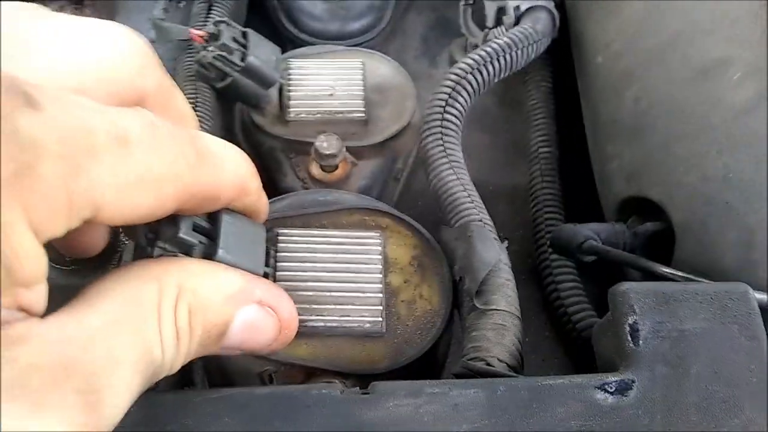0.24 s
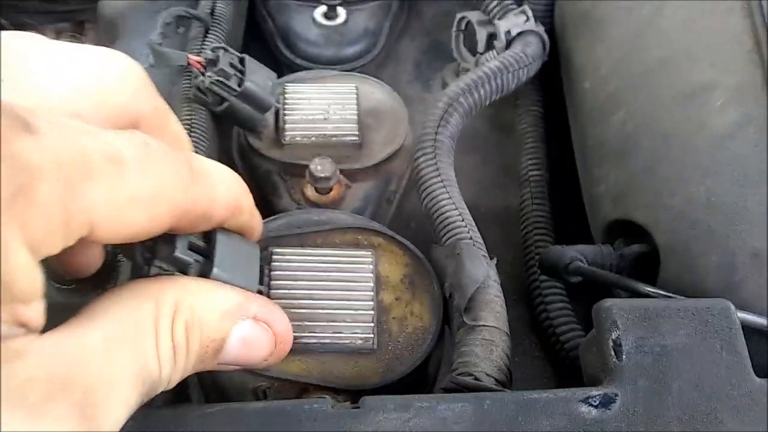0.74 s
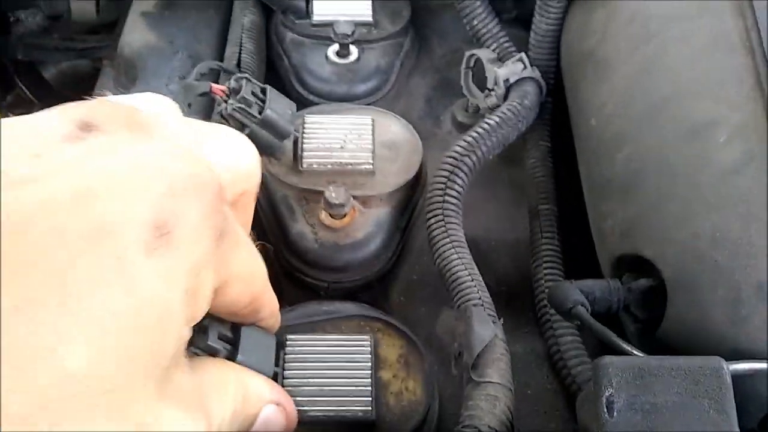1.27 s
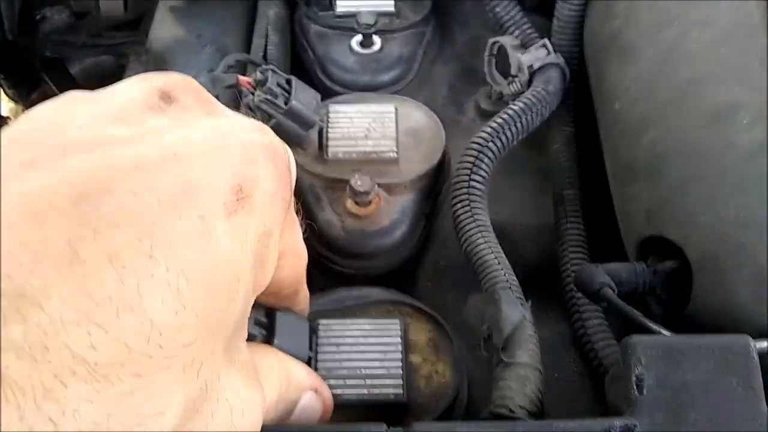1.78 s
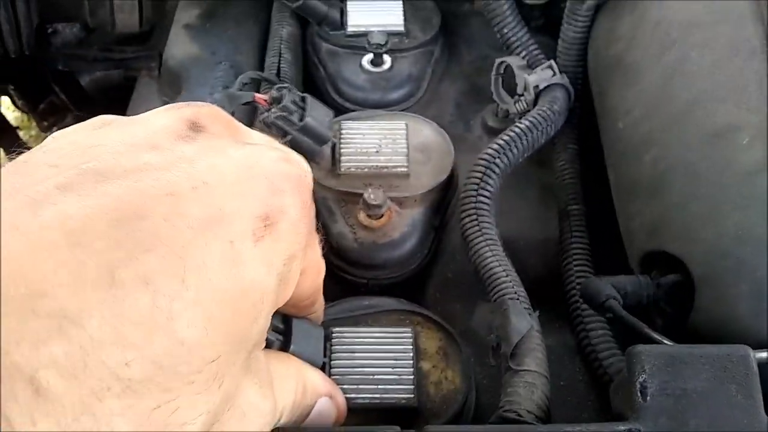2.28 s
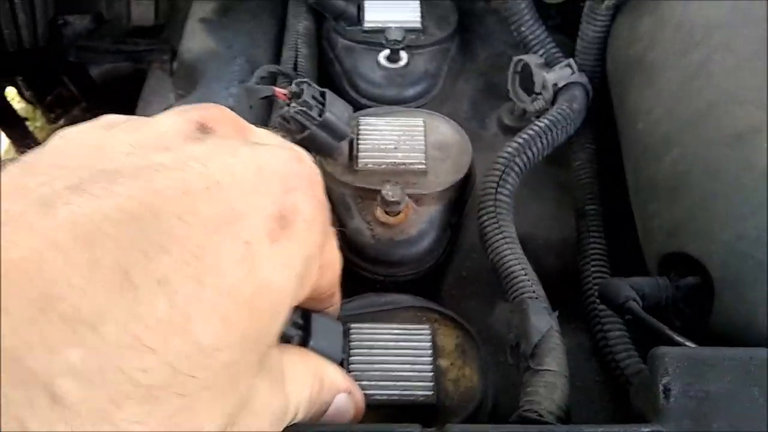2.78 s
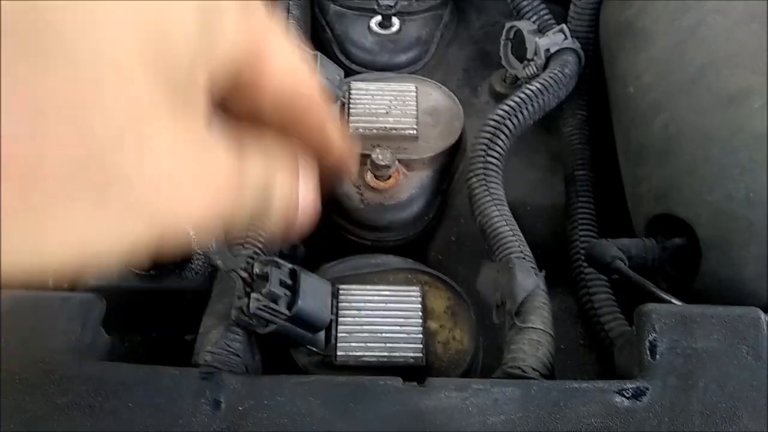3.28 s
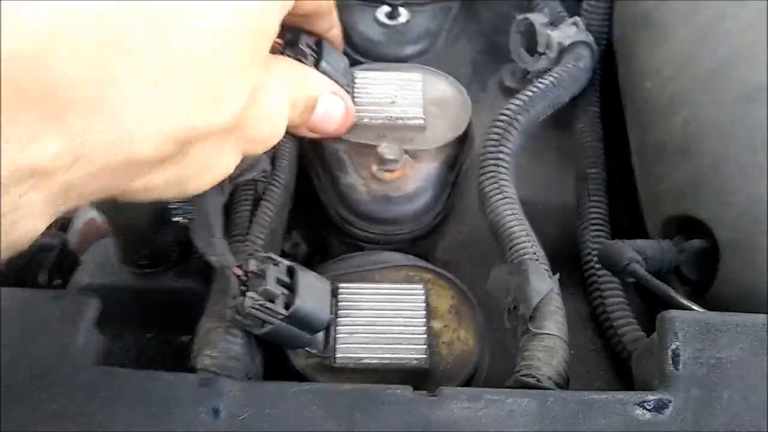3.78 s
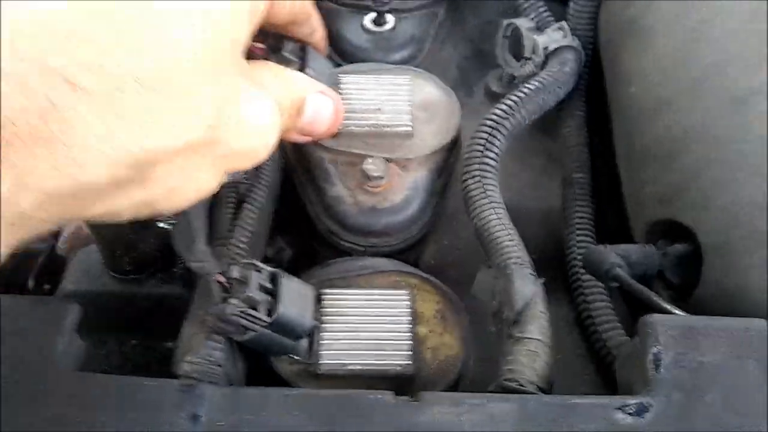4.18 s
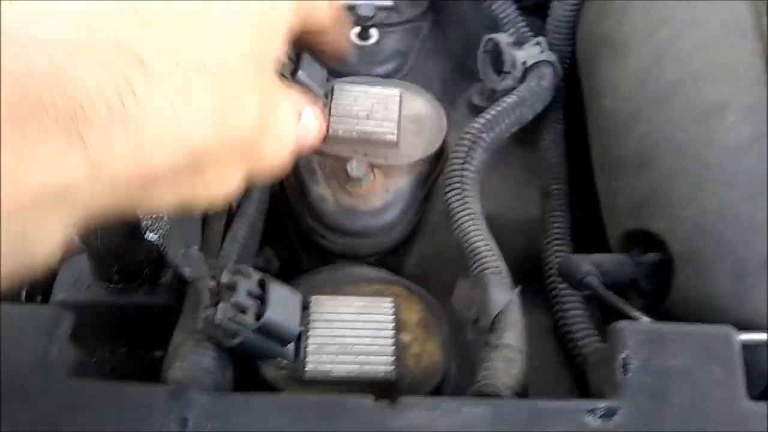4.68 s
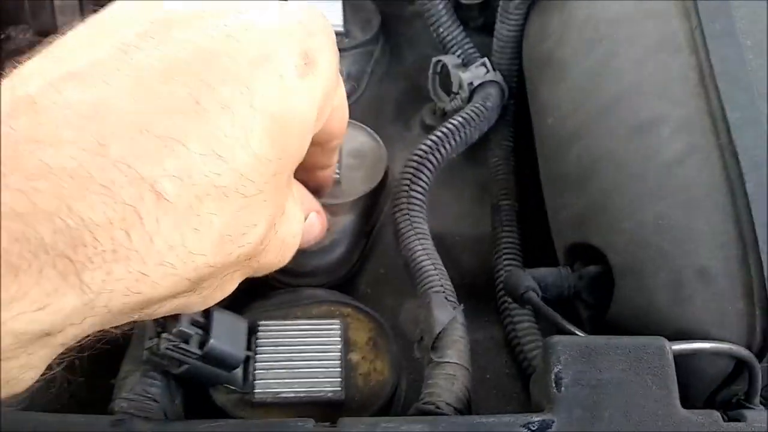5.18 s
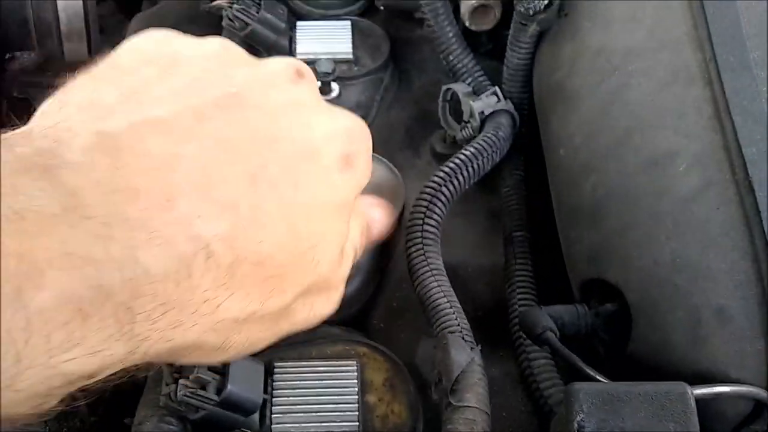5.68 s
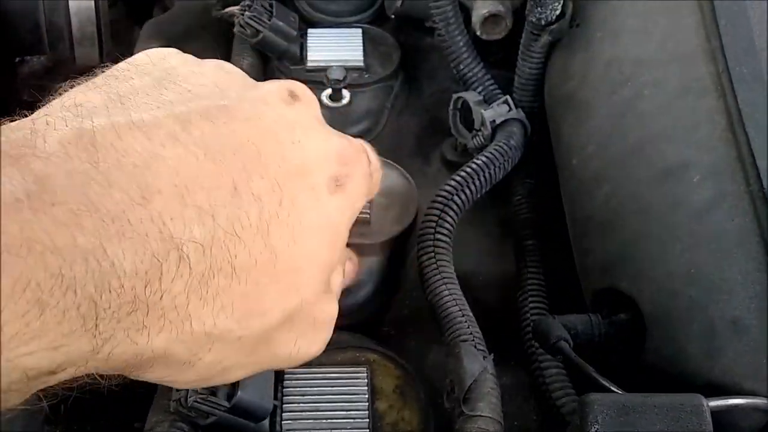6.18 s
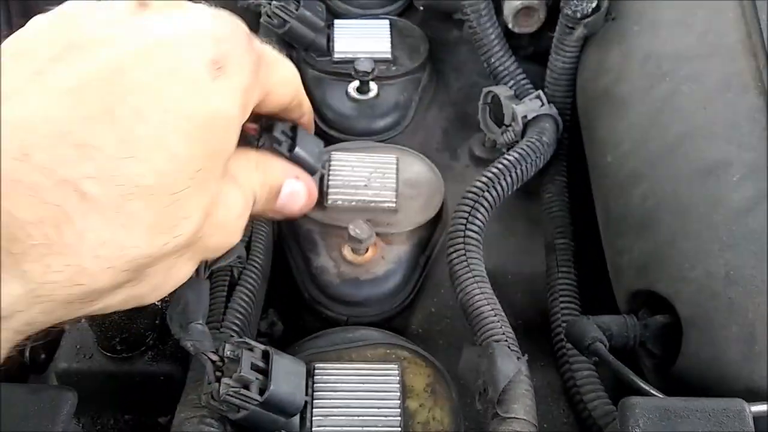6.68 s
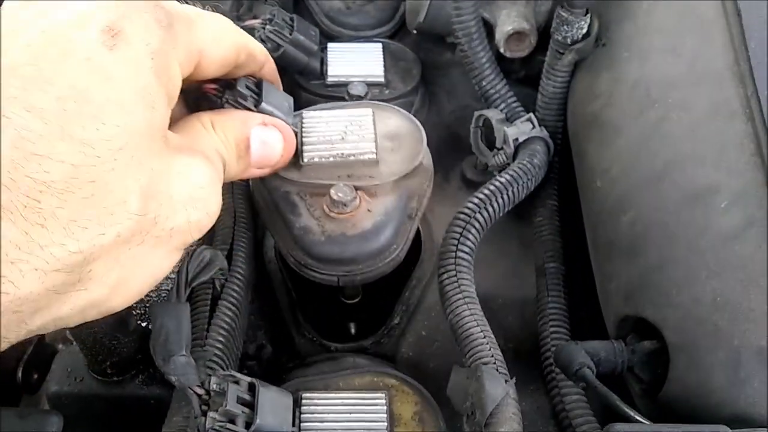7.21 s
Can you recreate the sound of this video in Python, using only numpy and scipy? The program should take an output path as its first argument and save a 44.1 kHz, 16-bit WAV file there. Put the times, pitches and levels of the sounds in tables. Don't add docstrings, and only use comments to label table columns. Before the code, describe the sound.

Close under an open bonnet, a six-cylinder engine idles with metallic clatter, low exhaust throb and airy hiss. Sharp ignition snaps tick regularly through the first second, then cease. The belt chirps on every firing, growing into harsher squeals as the idle slows and stumbles. Two isolated duller pops come midway, and stronger hollow pops return at the end. A phone microphone very near gives a thin, dry stereo sound.

```python
import sys
import numpy as np
from scipy import signal
from scipy.fft import rfft, irfft, next_fast_len
from scipy.io import wavfile
from scipy.ndimage import uniform_filter1d

SR = 44100
rng = np.random.default_rng(int(sys.argv[2]) if len(sys.argv) > 2 else 0)


def decibels_to_gain(level_db):
    exponent = np.asarray(level_db, float) / 20
    return 10 ** exponent


def bounce(signal):
    frames = np.transpose(np.atleast_2d(signal))
    limited = np.clip(frames, -1, 1)
    pcm = np.round(limited * 32767).astype(np.int16)
    wavfile.write(sys.argv[1], SR, pcm)


N = 328545

# time in seconds, loudness of clatter and hiss in dB, belt slip
# in dB, idler pulley slip in dB.
ENGINE_BAY = [(0, 3.5, -33, -8), (.12, -4, 2, -10), (.5, 0, -15, -4), (.95, -2, 2, -3), (1.2, 0.5, 1.5, -4),
              (1.68, -1, 5, -4), (2.0, -1, 5, 1), (2.7, 2, -2, 1), (3.15, -1.5, 4.5, 0),
              (3.4, -1, -0.5, -1), (3.9, 2.5, 1.5, -2), (4.25, -1.5, 4.5, -1.5), (5.0, -1, 5.5, 3),
              (5.4, 1, 3.5, -1.5), (6.2, -2, 7, 6.5), (6.8, 3.5, -1, 0.5), (6.95, -2, -3.5, -3),
              (7.45, -3, 4.5, -2)]
# time in seconds, firings per second, misfire depth from 0 to 1.
IDLE_SPEED = [
    (0, 33.4, .3),
    (.9, 33.3, .3),
    (1.6, 32.6, .35),
    (2.4, 32.85, .35),
    (3.2, 32.4, .4),
    (3.6, 31.2, .6),
    (4.3, 30.9, .9),
    (5, 30.4, 1),
    (5.7, 30.25, 1),
    (7.45, 30.13, 1),
]


def unit(x):
    return x / np.sqrt(np.mean(x ** 2) + 1e-20)


def along(points, hz):
    f, v = np.transpose(points)
    return np.interp(np.log(hz + 1), np.log(f + 1), v)


def curves(rows):
    s, *columns = np.transpose(rows)
    t = np.arange(N) / SR
    return [np.interp(t, s, column) for column in columns]


def filtered(x, response):
    length = x.shape[-1]
    m = next_fast_len(length + 8192)
    hz = np.fft.rfftfreq(m, 1 / SR)
    return irfft(rfft(x, m) * response(hz), m)[..., :length]


def modes(rows):
    def response(f):
        total = 0
        for k, (centre, width, db) in enumerate(rows):
            damping = 1j * f * width
            sign = (-1) ** k
            total = total + sign * decibels_to_gain(db) * damping / (centre * centre - f * f + damping)
        return total
    return response


def ports(colour, patchy_db=0):
    # frequency in Hz, likeness from 0 to 1.
    alike = [(100, 1), (500, 0.88), (900, 0.26), (1500, 0.069), (3000, 0.15)]
    pair = rng.standard_normal((2, N))
    if patchy_db:
        z = signal.stft(pair, nperseg=256)[2]
        field = rng.standard_normal(z.shape[1:])
        field = uniform_filter1d(field, size=5, axis=0)
        field = uniform_filter1d(field, size=9, axis=1)
        pair = signal.istft(z * decibels_to_gain(patchy_db * unit(field)), nperseg=256)[1][:, :N]

    def share(hz):
        angle = np.arccos(np.clip(along(alike, hz), 0, 1)) / 2
        return colour(hz) * np.array([np.cos(angle), np.sin(angle)])

    common, apart = filtered(pair, share)
    return unit(np.array([common + apart, common - apart]))


def bursts(times, levels_db, rise, fall):
    marks = np.zeros(N)
    marks[np.round(times * SR).astype(int)] = decibels_to_gain(levels_db)
    t = np.arange(-SR // 20, SR // 20 + 1) / SR
    swell = np.exp(-(t / np.where(t < 0, rise, fall)) ** 2)
    return signal.oaconvolve(marks, swell, "same")


def bay():
    loudness_db = curves(ENGINE_BAY)[0]
    return -31.5 + loudness_db, -40.5 + 1.8 * loudness_db


def exhaust():
    # pitch in Hz, width in Hz, level in dB.
    pipe = [(72, 19, -7.5), (93, 16.2, 3.5), (131.3, 11, -1), (188, 51, -22), (244, 37, -18)]
    # pitch in Hz, width in Hz, level in dB.
    box = [(133, 30, 9), (190, 61, -3)]
    # frequency in Hz, level in dB per Hz.
    flow = [(20, -19), (50, -5), (80, -5), (110, -5.5), (160, -7.5), (280, -17), (500, -23), (900, -44)]
    # time in seconds, level in dB.
    load = [
        (0.0, -43),
        (0.85, -44),
        (1.56, -38),
        (3.48, -39.5),
        (3.94, -37),
        (4.23, -40),
        (6.93, -39.5),
        (6.97, -44),
        (7.45, -42),
    ]
    (rate, misfire), (level_db,) = curves(IDLE_SPEED), curves(load)
    count = np.cumsum(rate) / SR
    count -= count[round(5.668 * SR)]
    fired = np.flatnonzero(np.diff(np.floor(count)))
    dead = fired[np.floor(count[fired + 1]) % 6 == 0]
    pulses, puffs = np.zeros((2, N))
    pulses[fired] = decibels_to_gain(0.46 * rng.standard_normal(len(fired)))
    puffs[dead] = decibels_to_gain(0.6 * rng.standard_normal(len(dead)))
    tone = unit(filtered(pulses, lambda f: modes(pipe)(f) / (1 + 1j * f / 300) ** 2))
    puff = misfire * unit(filtered(puffs, lambda f: modes(box)(f) ** 2))
    rumble = ports(lambda f: decibels_to_gain(along(flow, f)))
    beat = tone + decibels_to_gain(-3.5) * puff + decibels_to_gain(-1.5) * rumble
    return decibels_to_gain(level_db + 7) * beat


def block(slips):
    # pitch in Hz, width in Hz, level in dB.
    metal = [(390, 67, 0), (482, 40.6, 1.5), (577, 55.6, -0.5), (740, 111, -3.5), (1050, 230, -3.5),
             (1279, 119, -2), (1634, 690, -10)]
    clatter_db, _ = bay()
    s, _, _, scuff_db = slips
    sharp = bursts(s, scuff_db + 26, rise=0.0074, fall=0.0095)
    slow = bursts(s, scuff_db + 20, rise=0.029, fall=0.064)
    knock = 1 + sharp + slow
    return decibels_to_gain(clatter_db - 5.5) * knock * ports(modes(metal), patchy_db=1.5)


def chirps():
    # high squeal in dB, low squeal in dB, scuff in dB,
    # lateness in firings.
    cylinders = [(-35, -32.5, -33.5, 0.05), (-55, -45, -40.5, 0.04), (-39.5, -51, -36, 0.056),
                 (-35, -32.5, -34.5, .05), (-32.5, -30, -32, 0.0059), (-33, -33, -31, 0.084)]
    # time in seconds, high squeal in dB, low squeal in dB, scuff in dB.
    grabs = [(0.482, -27, -28, -36), (0.662, -19.5, -45, -35.5), (0.842, -22.5, -52, -44),
             (1.052, -22, -32, -32), (1.383, -16, -39, -32.5), (1.753, -21, -39, -30),
             (2.516, -38, -27, -24.5), (2.855, -23, -34, -26), (3.155, -25.5, -27, -25.5),
             (3.24, -23, -42, -23.5), (3.378, -25, -33, -27.5), (3.818, -17.5, -36, -27),
             (3.849, -17.5, -48, -34), (3.946, -17.5, -26, -37), (3.977, -18, -31, -27),
             (4.367, -18.5, -27, -23.5), (4.434, -24, -31, -28), (4.599, -17, -34, -28),
             (4.762, -15.5, -31, -30), (4.826, -14, -31, -27), (5.087, -22.5, -20.5, -29.5),
             (5.187, -15, -39, -27.5), (5.482, -23.5, -17, -33), (5.781, -18.5, -21, -25),
             (6.112, -19.5, -22, -21), (6.374, -36, -26, -22.5), (6.572, -23, -22, -27),
             (6.741, -31, -20, -29), (6.9, -24, -22, -23.5), (7.168, -19.5, -33, -29)]
    # high squeal in dB, scuff in dB, per full misfire depth.
    misfire_db = (12, 0.5)
    # high squeal in dB, low squeal in dB, scuff in dB.
    scatter_db = (3.5, 4, 2)
    (rate, misfire), (_, slip_db, idler_db) = curves(IDLE_SPEED), curves(ENGINE_BAY)
    count = 0.02 + np.cumsum(rate) / SR
    number = np.arange(1, int(count[-1]))
    habit = np.array(cylinders)[number % len(cylinders)]
    luck = rng.standard_normal((len(number), 4))
    s = np.interp(number + habit[:, 3] + 0.063 * luck[:, 3], count, np.arange(N) / SR)
    at = (s * SR).astype(int)
    high_db, scuff_db = slip_db[at] + np.outer(misfire_db, misfire[at] - 0.5)
    moment_db = np.transpose([high_db, idler_db[at], scuff_db])
    level_db = habit[:, :3] + moment_db + luck[:, :3] * scatter_db
    rows = np.column_stack([s, level_db])
    nearest = np.abs(s - np.array(grabs)[:, :1]).argmin(axis=1)
    rows[nearest] = grabs
    return rows.T


def belt(slips):
    # frequency in Hz, level in dB per Hz.
    air_colour = [(900, -11), (1500, -14.5), (2300, -2), (3300, -5), (5000, 0), (6800, -2.5), (8600, -4.5),
                  (9700, -1.5), (11300, -8), (12200, -8), (12900, -15), (14200, -12)]
    # pitch in Hz, width in Hz, level in dB.
    pulley = [(5548, 67, 1), (5453, 158, -6.5), (7260, 300, -14.5)]
    # pitch in Hz, width in Hz, level in dB.
    idler = [(3795, 65, -1), (3705, 110, -5), (4360, 84, -8)]
    # pitch in Hz, width in Hz, level in dB.
    alternator = [(2205, 24, 7.5), (2218, 52, -5)]
    s, high_db, low_db, scuff_db = slips
    _, hiss_db = bay()
    idler_db = curves(ENGINE_BAY)[2]
    air = lambda f: decibels_to_gain(along(air_colour, f))

    drag = bursts(s, scuff_db - 13.5, rise=0.02, fall=0.037)
    scuff = bursts(s, scuff_db + 0.5, rise=0.0049, fall=0.006) * ports(air, patchy_db=4.0)
    hiss = (decibels_to_gain(hiss_db + 1.0) + drag) * ports(air, patchy_db=2.0)

    linger = bursts(s, high_db - 15.5, rise=0.014, fall=0.02)
    squeal = bursts(s, high_db - 7, rise=0.0048, fall=0.0081)
    high = (decibels_to_gain(hiss_db - 8) + linger + squeal) * ports(modes(pulley), patchy_db=3.0)
    groan = bursts(s, low_db - 10, rise=0.011, fall=0.019)
    low = (decibels_to_gain(hiss_db + idler_db - 7) + groan) * ports(modes(idler), patchy_db=3.5)

    hum = ports(modes(alternator))
    hum = hum + 0.4 * hum[::-1]
    whine = (decibels_to_gain(hiss_db - 12.5) + decibels_to_gain(1.5) * drag) * hum
    return scuff + hiss + high + low + whine


def sparks():
    # time of the pressure peak in seconds, peak in dB, pitch of the well in Hz,
    # crack in dB, rise in seconds.
    arcs = [(0.0231, -3, 730, -11, 0.00082), (0.2018, -5, 724, -9, 0.00078), (0.3823, -4, 725, -8, 0.0011),
            (0.5621, -6, 727, -5.5, 0.00063), (0.7429, -4.5, 730, -8.5, 0.00079),
            (0.9238, -11.5, 696, -24, 0.001), (3.8526, -6, 630, -20, 0.0015),
            (4.5572, -7, 630, -22, 0.0012), (6.9253, 0.5, 687, -22, 0.0021),
            (6.9654, -3.5, 740, -13.5, 0.00073), (7.1649, -1, 774, -15, 0.0017),
            (7.3641, 0, 753, -15.5, 0.0017)]
    # pitch as a ratio to the first, level in dB.
    well = [(1.36, -1), (1.8, -5.5)]
    # pitch in Hz, width in Hz, level in dB.
    crack = [(2980, 230, -5.5), (5090, 460, -2), (6640, 180, 2), (9650, 890, -2), (12000, 760, -6),
             (13500, 610, -10)]
    # frequency in Hz, gain there in dB.
    well_side = [(700, 5), (3000, 12), (7000, 8.5), (12000, -6)]
    out, lead = np.zeros(N + SR), SR // 200
    t = np.arange(-lead, SR // 8) / SR
    after = np.maximum(t, 0)
    for s, db, hz, crack_db, rise in arcs:
        upper_db = 4.5 + 0.93 * crack_db
        swing = lambda ratio: np.cos(2 * np.pi * hz * ratio * t - 0.9)
        ring = swing(0.99) * decibels_to_gain(-60 * after / 0.022)
        for ratio, level_db in well:
            ring += decibels_to_gain(upper_db + level_db - 60 * after / 0.023) * swing(ratio)
        ring += decibels_to_gain(-29.5 - 60 * after / 0.0037) * (rise / 0.00099) ** 4 * swing(0.2)
        ring *= np.exp(-(np.minimum(t, 0) / rise) ** 2)
        burst = (t > -rise) * decibels_to_gain(-60 * (t + rise) / 0.03) * rng.standard_normal(len(t))
        pop = ring + decibels_to_gain(crack_db + 14.0) * filtered(burst, modes(crack))
        out[round(s * SR) - lead:][:len(t)] += decibels_to_gain(db - 13.5) * pop

    def bonnet(f):
        first = decibels_to_gain(-18.5) * np.exp(-2j * np.pi * f * 0.0084)
        second = decibels_to_gain(-25.0) * np.exp(-2j * np.pi * f * 0.022)
        return (1 + first + second) / (1 + (f / 14500) ** 60)

    pop = filtered(out[:N], bonnet)
    return np.array([pop, filtered(pop, lambda f: decibels_to_gain(along(well_side, f)))])


def scene():
    # frequency in Hz, level in dB.
    shade = [(40, -1), (100, 2), (250, 1), (700, 1.5), (1300, -1), (3500, 0), (5500, -2.5), (8000, -6.5),
             (12000, -3.5), (14000, -1)]
    # frequency in Hz, time in seconds.
    early = [(60, 0.00027), (130, 3e-5), (500, 4e-5), (1100, -2e-5), (2000, 1e-6)]
    slips = chirps()
    edge = lambda f: 1 / (1 + (f / 14235) ** 300)
    near, far = filtered(exhaust() + block(slips) + belt(slips), edge) + sparks()
    body = lambda f: decibels_to_gain(along(shade, f)) * np.exp(2j * np.pi * f * along(early, f))
    return np.array([near, filtered(far, body)])


def band_limit(x):
    return signal.sosfilt(signal.butter(12, 15510, fs=SR, output="sos"), x)


def record(dry):
    # frequency in Hz, share subtracted.
    null_sum = [(100, .97), (2200, .8), (4500, .76), (7000, .58), (9000, .48), (14000, .44)]
    # frequency in Hz, share subtracted.
    null_diff = [(1100, .87), (3400, .95), (4500, .55), (7000, .42), (12300, .42), (14000, .45)]

    def comb(f):
        late = np.exp(-2j * np.pi * f * 19.75 / 44100)
        sum_share = np.clip(along(null_sum, f), 0, 1)
        diff_share = np.clip(along(null_diff, f), 0, 1)
        return 1 + late * np.array([-sum_share, diff_share])

    both = np.array([dry[0] + dry[1], dry[0] - dry[1]]) / 2
    mid, side = filtered(both, comb)
    return band_limit(np.array([mid + side, mid - side]))


dry = scene()
out = record(dry)
bounce(out)
```